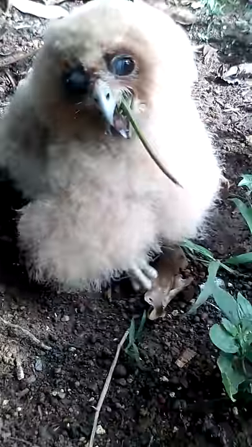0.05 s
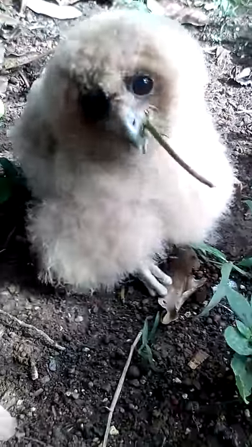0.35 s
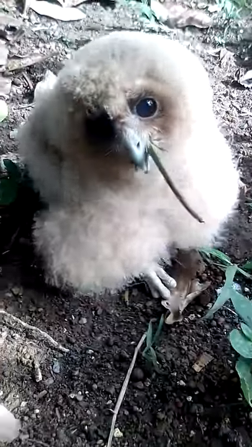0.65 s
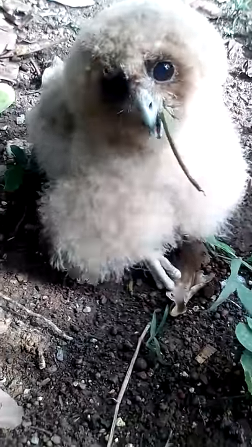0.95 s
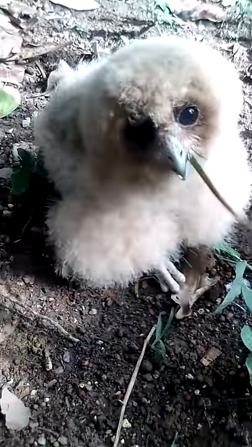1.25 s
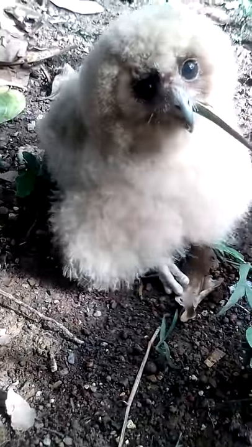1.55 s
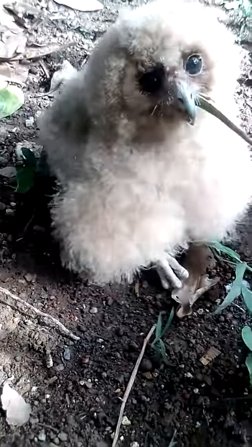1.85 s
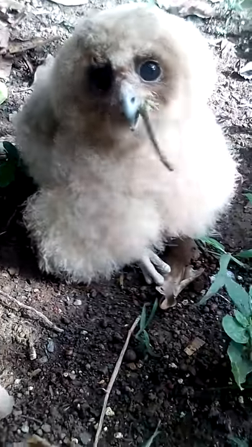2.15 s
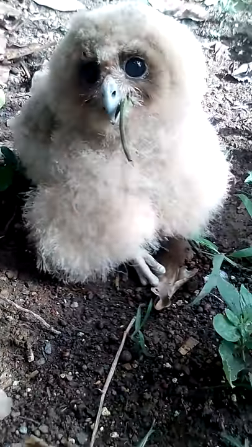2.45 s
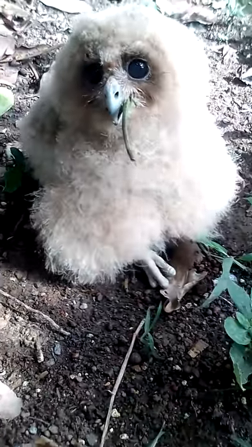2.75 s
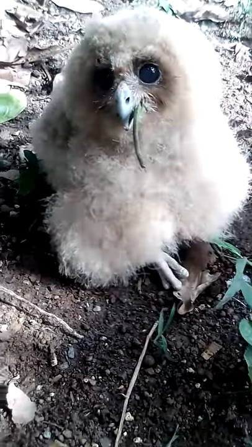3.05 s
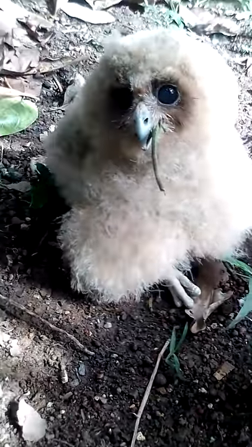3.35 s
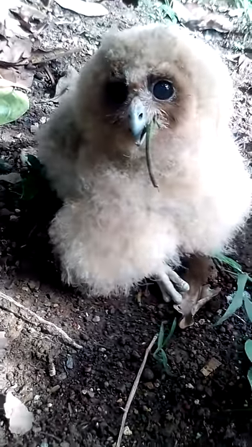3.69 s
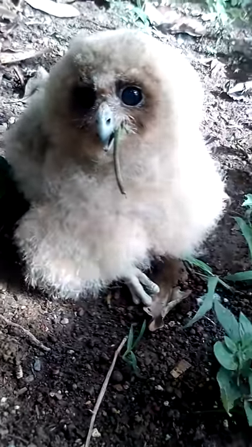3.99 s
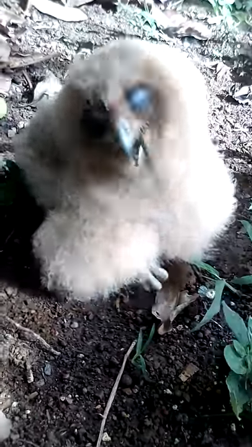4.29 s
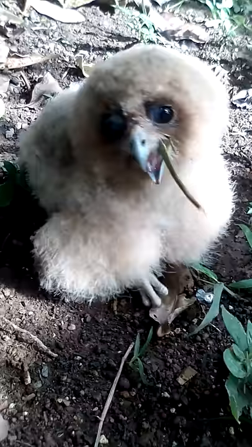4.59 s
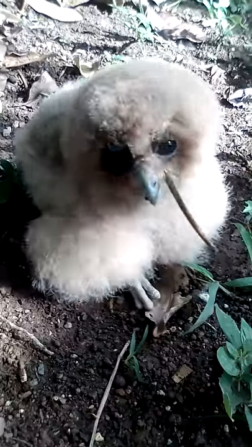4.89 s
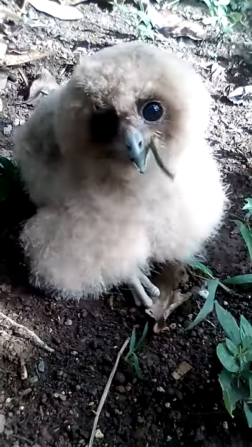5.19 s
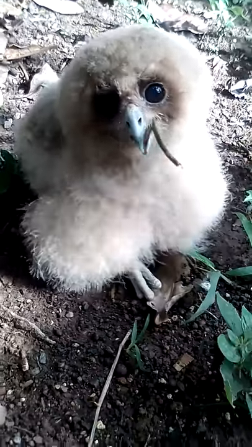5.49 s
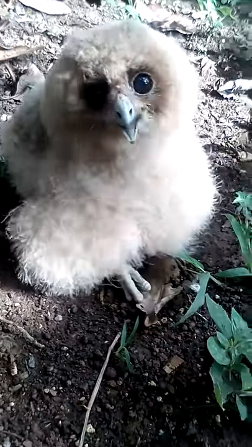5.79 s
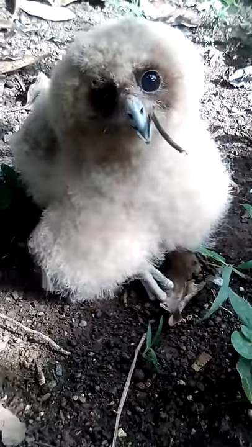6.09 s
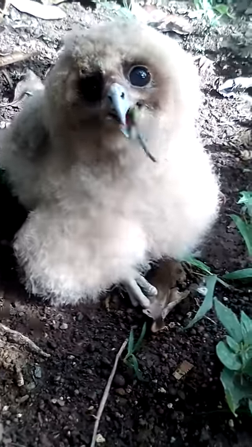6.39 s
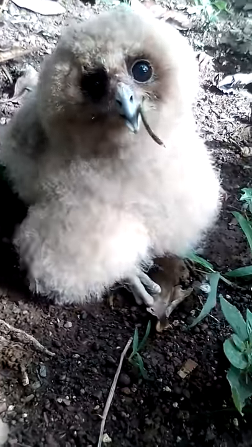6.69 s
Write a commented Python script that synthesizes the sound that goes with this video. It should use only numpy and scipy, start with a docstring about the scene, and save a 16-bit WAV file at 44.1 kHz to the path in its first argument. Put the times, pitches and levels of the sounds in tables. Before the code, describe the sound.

A small dog yaps and whines in a yard while a distant songbird trills, then an owl chick snaps its bill once.

```python
"""A yard: low outdoor murmur and a thin, steady high tone throughout. A small dog, out of sight, yaps
once, then whines, its wavering pitch breaking into a growl. From 1.2 s a songbird trills farther off,
while the dog yaps twice, whines again over a far motor and yaps three times. Muffled whimpers and a few
chirps follow. At 6.1 s an owl chick on the ground rustles and snaps its bill once, then scuffs softly."""
import sys
import numpy as np
from scipy import signal
from scipy.fft import rfft, irfft
from scipy.io import wavfile
from scipy.ndimage import uniform_filter1d, minimum_filter1d

SR = 44100
rng = np.random.default_rng(int(sys.argv[2]) if len(sys.argv) > 2 else 0)


def store_wav(level_fs):
    """Save 16-bit WAV to argv[1]."""
    pcm = np.round(np.clip(np.atleast_2d(level_fs), -1, 1) * 32767)
    wavfile.write(sys.argv[1], SR, pcm.T.astype(np.int16))


N = 297234
TIME = np.arange(N) / SR


def from_db(db):
    return 10 ** (np.asarray(db) / 20)


def unit_rms(x):
    return x / np.sqrt(np.mean(x ** 2) + 1e-20)


def ramp(x):
    return np.clip(x, 0, 1)


def peak(hz, centre_hz, half_width_hz):
    """Resonance curve, height 1."""
    return 1 / (1 + ((hz - centre_hz) / half_width_hz) ** 2)


def in_time(rows, t=TIME):
    """Table columns interpolated at t."""
    times, *columns = np.transpose(rows)
    return [np.interp(t, times, column) for column in columns]


def at_hz(points, hz, column=1):
    """Table column interpolated in log frequency."""
    points = np.array(points)
    return np.interp(np.log(hz + 1e-9), np.log(points[:, 0]), points[:, column])


def span(start_s, end_s):
    """Indices, times and a gate with 4 ms edges."""
    at = np.flatnonzero((TIME >= start_s) & (TIME <= end_s))
    t = TIME[at]
    return at, t, ramp(np.minimum(t - t[0], t[-1] - t) / .004)


def noise(spectrum, size):
    """Coloured noise, rolled off below the first point; rms 1."""
    hz = np.arange(size // 2 + 1) * SR / size
    low_cut = np.minimum(hz / spectrum[0][0], 1) ** 8
    white = rfft(rng.standard_normal(size))
    return unit_rms(irfft(white * low_cut * from_db(at_hz(spectrum, hz)), size))


def drift(rate_hz, size):
    """Low-passed random wander; rms 1."""
    hz = np.arange(size // 2 + 1) * SR / size
    white = rfft(rng.standard_normal(size))
    return unit_rms(irfft(white * (hz > 0) * peak(hz, 0, rate_hz), size))


def phase_of(hz):
    return 2 * np.pi * np.cumsum(hz) / SR


def glides(rows, jitter):
    """Short, swelling tones that slide in pitch."""
    out = np.zeros(N)
    for start_s, length_s, first_hz, last_hz, level_db in rows:
        at, t, _ = span(start_s, start_s + length_s)
        pitch_hz = np.interp(t, [start_s, start_s + length_s], [first_hz, last_hz])
        pitch_hz *= 1 + jitter * drift(340, len(t))
        out[at] += from_db(level_db) * np.hanning(len(t)) * np.sin(phase_of(pitch_hz))
    return out


# murmur spectrum: (frequency [Hz], density [dB])
MURMUR_SPECTRUM = [(20, -24), (45, -9.5), (85, 2.5), (160, 1), (350, -3.5), (620, -9.5), (790, -4.5),
                   (1150, -17), (1500, -11.5), (2000, -17), (2500, -16.5), (3300, -22.5), (6500, -24.5),
                   (9000, -31), (15500, -29.5)]
# rumble swing: (time [s], gain [dB])
RUMBLE_SWING = [(0, 9), (.7, -2), (1.5, 0.5), (3.6, -3.5), (4.5, 4.5), (6.1, -3), (6.74, 0.5)]


def murmur(level_db=-57.5, flutter_db=1.5, gust_db=1.5, rumble_hz=220):
    """Outdoor noise with an uneven low rumble."""
    air = from_db(level_db + flutter_db * drift(6.5, N)) * noise(MURMUR_SPECTRUM, N)
    rumble = signal.sosfiltfilt(signal.butter(2, rumble_hz, fs=SR, output="sos"), air)
    swing_db = in_time(RUMBLE_SWING)[0] + gust_db * drift(6, N)
    return air - rumble + rumble * from_db(swing_db)


def far_motor(hum_hz=74, idle_db=-76, full_db=-55.5, start_s=2.08, end_s=3, fade_s=.14):
    """A hum swells from idle and sinks back."""
    running = ramp(np.minimum(TIME - start_s, end_s - TIME) / fade_s)
    rms = from_db(idle_db + (full_db - idle_db) * running)
    return np.sqrt(2) * rms * np.sin(phase_of(hum_hz + 2 * drift(8, N)))


def high_tone(pitch_hz=12880, width_hz=35, level_db=-76):
    """A thin, steady tone with slight jitter."""
    return np.sqrt(2) * from_db(level_db) * np.sin(phase_of(pitch_hz + width_hz * drift(100, N)))


# yard reverberation: (frequency [Hz], t60 [s], gain [dB])
YARD_DECAY = [(301.8, 0.37, -34), (745, 0.4, -24.5), (1090, 0.74, -27), (1680, 0.61, -20),
              (3140, 0.53, -17.5), (6000, 0.17, -13.5), (12000, 0.37, -9.5)]


def yard_scatter(x, wet_db, build_s=.0053):
    """Diffuse scatter from walls and leaves, decaying band by band."""
    t, response = TIME[:SR], np.zeros(SR)
    edges_hz = np.geomspace(200, 15000, 14)
    for low_hz, high_hz in zip(edges_hz, edges_hz[1:]):
        hz = np.sqrt(low_hz * high_hz)
        decay = from_db(-60 * t / at_hz(YARD_DECAY, hz)) * (1 - np.exp(-t / build_s))
        bandpass = signal.butter(2, [low_hz, high_hz], "band", fs=SR, output="sos")
        band = signal.sosfilt(bandpass, rng.standard_normal(SR))
        response += band * decay / np.linalg.norm(decay) * from_db(at_hz(YARD_DECAY, hz, column=2))
    return from_db(wet_db) * signal.fftconvolve(x, response)[:N]


# early reflections: (delay [s], gain [dB])
REFLECTIONS = [(.0045, -20.5), (.0158, -11), (.034, -23.5)]


def echoes(x):
    """Single bounces off the ground and walls."""
    return sum(from_db(db) * np.interp(TIME - delay_s, TIME, x, left=0) for delay_s, db in REFLECTIONS)


# one trill note: (position [0-1], pitch [Hz], gain [dB])
TRILL_NOTE = [(0, 7820, -25.5), (.2, 7865, -13), (.5, 6610, -13), (.75, 6115, 1.5), (.83, 5900, -10),
              (.92, 5394, 13), (1, 5200, -20)]
# trill scattered by foliage: (frequency [Hz], density [dB])
FOLIAGE_SPECTRUM = [(5250, -6.5), (5700, 4.5), (6500, -2), (7600, -7), (8600, -24), (14000, -50.5)]
# single chirps: (start [s], length [s], first pitch [Hz], last pitch [Hz], level [dB])
BIRD_CHIRPS = [(5.652, 0.05, 6220, 6890, -64.5), (5.786, 0.038, 7080, 6340, -61.5),
               (5.82, 0.033, 6480, 6040, -63), (5.87, 0.06, 5880, 5660, -63.5)]


def songbird(start_s=1.16, end_s=4.9, note_s=.1185, jitter=.011, rise_db_per_s=16, fall_db_per_s=7):
    """Falling notes, blurred by foliage, swell, hold and fade; single chirps follow."""
    out = glides(BIRD_CHIRPS, jitter)
    at, t, gate = span(start_s, end_s)
    envelope_db = -49.5 - rise_db_per_s * np.maximum(2 - t, 0) - fall_db_per_s * np.maximum(t - 2.78, 0)
    pitch_hz, note_db = in_time(TRILL_NOTE, (t - start_s) / note_s % 1)
    pitch_hz *= 1 + jitter * drift(270, len(t))
    notes = from_db(note_db - 7) * np.sin(phase_of(pitch_hz))
    blur = from_db(-13) * noise(FOLIAGE_SPECTRUM, len(t))
    out[at] += gate * from_db(envelope_db) * (notes + blur)
    return out


def knock(start_s, level_db, hz, t60_s, rise_s=.00029):
    """One mode, struck once."""
    age_s = np.clip(TIME - start_s, 0, 5 * t60_s)
    envelope = from_db(level_db - 60 * age_s / t60_s) * (1 - np.exp(-age_s / rise_s))
    return envelope * np.sin(2 * np.pi * hz * age_s)


# contacts of one snap: (time [s], strength [dB])
BILL_CONTACTS = [(6.061, -34), (6.1063, -12)]
# bill and mouth modes: (frequency [Hz], gain [dB], t60 [s])
BILL_MODES = [(560, -23, 0.01), (1480, -13, 0.0024), (3370, -18, 0.0032), (6300, -11, 0.0021),
              (6800, -8.5, 0.0021), (9000, -29, 0.0017)]
# dry rustle: (frequency [Hz], density [dB])
RUSTLE_SPECTRUM = [(800, -3), (2000, -23), (4000, -20), (6400, -10.5), (8500, -21), (14000, -37)]
# soft bumps and scuffs: (time [s], level [dB], pitch [Hz], t60 [s])
SCUFFS = [(6.432, -41, 693, 0.015), (6.461, -45.5, 1010, 0.036), (6.51, -41, 197, 0.027),
          (6.537, -39, 185, 0.04), (6.579, -37, 207, 0.023)]


def owl_chick(bill_gain_db=11.5, rustle_s=(5.87, 6.13), rise_db_per_s=85.5):
    """A rustle grows, the bill claps shut, scuffs follow."""
    out = sum(knock(start_s, bill_gain_db + strength_db + mode_db, hz, t60_s)
              for start_s, strength_db in BILL_CONTACTS for hz, mode_db, t60_s in BILL_MODES)
    at, t, gate = span(*rustle_s)
    rustle_db = -54.5 - rise_db_per_s * (rustle_s[1] - t)
    out[at] += gate * from_db(rustle_db) * noise(RUSTLE_SPECTRUM, len(t))
    return out + sum(knock(*scuff) for scuff in SCUFFS)


# growls: (start [s], end [s], depth [0-1])
GROWL_SPANS = [(0.274, 0.399, 1), (.4, 0.503, 0.37), (0.499, .63, .62), (3.389, 3.64, 0.59),
               (5.03, 5.73, 0.41)]


def growling(t, pitch_hz, onset_s=.024, break_hz_per_s=26000):
    """How far the folds split into strong and weak beats, 0-1: in growls and on fast slides."""
    held = sum(depth * ramp(np.minimum(t - start_s, end_s - t) / onset_s + .5)
               for start_s, end_s, depth in GROWL_SPANS)
    return ramp(held + np.abs(np.gradient(pitch_hz, t)) / break_hz_per_s)


# throat resonances: (frequency [Hz], gain [dB])
THROAT_RESPONSE = [(340, -11), (400, 1), (440, 9), (480, 4), (570, 12.5), (640, 5), (700, -1), (780, -10.5),
                   (850, 4), (950, 1), (1150, -14)]
# nearly closed muzzle: (frequency [Hz], gain [dB])
MUZZLE_RESPONSE = [(1050, -4.5), (1350, 1.5), (1750, 3), (2050, 0), (2400, -6.5), (2750, -18.5),
                   (3100, -19), (3450, -25.5), (4050, -18.5), (4850, -39), (5750, -26.5), (8000, -40),
                   (9800, -37), (12000, -49.5)]
# high nasal edge: (frequency [Hz], gain [dB])
NOSE_RESPONSE = [(5400, -1), (5900, 4.5), (6400, -16), (7200, -34.5), (14000, -46)]


def whine(rows, muffle_hz=13000, jitter=.003, growl_jitter=.012, shimmer_db=1.33, easy_db=-44):
    """A clean nasal tone; growling darkens it and adds lines halfway between the harmonics."""
    at, t, gate = span(rows[0][0], rows[-1][0])
    size = len(t)
    pitch_hz, voice_db, overtone_db = in_time(rows, t)
    pitch_hz = uniform_filter1d(pitch_hz, size=700)
    growl = growling(t, pitch_hz)
    phase = phase_of(pitch_hz * (1 + (jitter + growl_jitter * growl) * drift(81, size)))
    orders = np.arange(2, 57)[:, None] / 2
    hz, harmonic, low = orders * pitch_hz, orders % 1 == 0, orders <= 2
    weights = np.where(harmonic, 1, growl * from_db(-2))

    ring_db = 22 * growl * peak(hz, 720, 55)   # growling narrows the throat
    throat = low * weights * from_db(at_hz(THROAT_RESPONSE, hz) + ring_db)
    throat *= from_db(voice_db) / np.linalg.norm(throat, axis=0)

    bright_db = .5 * (overtone_db - easy_db) * ramp(hz / 2000 - 1)   # harder is brighter
    nasal_db = 4.5 * peak(hz, 2050, 45)
    uneven_db = 4.34 * np.array([drift(9.7, size) for _ in orders])
    muzzle = ~low * weights * from_db(at_hz(MUZZLE_RESPONSE, hz) + bright_db + nasal_db + uneven_db)
    muzzle *= from_db(overtone_db) / np.linalg.norm(muzzle, axis=0)
    muzzle /= 1 + (hz * (1 + 3 * growl) / muffle_hz) ** 4

    nose_hz = NOSE_RESPONSE[0][0]
    nose_gain = from_db(overtone_db - 18 - .35 * np.maximum(442 - pitch_hz, 0))   # fades below 442 Hz
    nose_gain /= 1 + (nose_hz / muffle_hz) ** 4
    nose = harmonic * (hz > nose_hz) * nose_gain * from_db(at_hz(NOSE_RESPONSE, hz) - 6)

    lines = np.sin(orders * phase + rng.uniform(0, 2 * np.pi, orders.shape))
    voice = ((throat + muzzle + nose) * lines).sum(0)
    voice += throat[0] * from_db(-19) * growl * np.sin(phase / 2)   # octave below
    breath = from_db(overtone_db - 25) * (1 + np.cos(phase)) * noise(MUZZLE_RESPONSE, size)
    hiss = nose_gain * from_db(-5) * noise(NOSE_RESPONSE, size)
    return at, gate * from_db(shimmer_db * drift(28, size)) * (np.sqrt(2) * voice + breath + hiss)


def bark_gesture(age_s, length_s, groan_s, top_hz, leap_s=.015, swell_s=.037, release_s=.029):
    """A rising groan leaps to a pitch arch, swells and is cut off; overtones follow the gape."""
    top_share, gape_share, sag_hz, end_drop_hz = .54, .61, 354.6, 150
    share = age_s / length_s
    release = ramp(1 - (length_s - age_s) / release_s)
    groan_hz = 345.8 + 4000 * age_s
    arch_hz = top_hz - sag_hz * ((share - top_share) / (1 - top_share)) ** 2 - end_drop_hz * release ** 2
    pitch_hz = groan_hz + (arch_hz - groan_hz) * ramp((age_s - groan_s) / leap_s)
    envelope_db = -13.5 * (1 - ramp((age_s - groan_s) / swell_s)) - 22.5 * release
    ring_db = 5.5 * peak(pitch_hz, 735, 45)   # pitch crosses the first resonance
    opening_db = -34.5 * ramp(1 - share / gape_share) ** 2.71
    closing_db = -23.5 * ramp((share - gape_share) / (1 - gape_share)) ** 2
    return pitch_hz, envelope_db + ring_db, opening_db + closing_db


# open mouth: (frequency [Hz], gain [dB])
MOUTH_RESPONSE = [(1000, -16), (1250, -12), (1415, 2.5), (1600, -3.5), (1830, -3.5), (2350, -16.5),
                  (3100, -16), (3650, -25.5), (4100, -27), (4800, -44.5), (5500, -33), (7100, -36.5),
                  (10000, -49.5), (14000, -75)]


def bark(start_s, length_s, groan_s, top_hz, voice_db, overtone_db, treble_db,
         jitter=.015, shimmer_db=4.5, attack_s=.02, push_s=.067):
    """A hard-driven voice; at its height the cycles group in threes and torn air rasps."""
    at, t, gate = span(start_s, start_s + length_s)
    size, age_s = len(t), t - start_s
    pitch_hz, envelope_db, gape_db = bark_gesture(age_s, length_s, groan_s, top_hz)
    phase = phase_of(pitch_hz * (1 + jitter * drift(150, size)))
    chaos = from_db(.37 * (gape_db - gape_db.max()))
    thirds = np.arange(2, 54)[:, None]
    orders, harmonic = thirds / 3, thirds % 3 == 0
    wander_rad = np.where(harmonic, .3, 1.2) * np.array([drift(41, size) for _ in orders])
    lines = np.sin(orders * phase + wander_rad + rng.uniform(0, 2 * np.pi, orders.shape))
    lines *= from_db(shimmer_db * np.array([drift(50, size) for _ in orders]))

    def through(response, split, rasp, shift=1, bright_db=0):
        """Lines and torn air in one part of the tract; rms 1."""
        hz = orders * pitch_hz / shift
        gains = from_db(at_hz(response, hz) + bright_db * ramp(hz / 2000 - 1))
        gains *= ramp(hz / response[0][0]) ** 4 * np.where(harmonic, 1, split * chaos)
        voiced = (gains * lines).sum(0) / np.sqrt((gains ** 2).sum(0) / 2)
        sound = voiced + rasp * chaos * noise(response, size)
        return sound / np.sqrt(uniform_filter1d(sound ** 2, size=500) + 1e-9)

    # first resonance: (frequency [Hz], gain [dB])
    formant = [(380, -21), (540, -19.5), (720, 2.5), (880, -3.5), (1020, -12.5), (1250, -27), (2200, -74)]
    jaw_shift = np.interp(t, [t[-1] - .04, t[-1]], [1, .82])   # the shutting jaw lowers it
    push_db = 10 * ramp(age_s / groan_s) * ramp(1 - age_s / push_s)   # the first push is brightest
    throat = through(formant, split=.29, rasp=.038, shift=jaw_shift)
    mouth = through(MOUTH_RESPONSE, split=1, rasp=.33, bright_db=treble_db + push_db)
    voice = from_db(voice_db + envelope_db) * throat + from_db(overtone_db + gape_db) * mouth
    bass_cut = signal.butter(6, 375, "high", fs=SR, output="sos")   # the bark carries no bass below 375 Hz
    return at, signal.sosfilt(bass_cut, gate * ramp(age_s / attack_s) * voice)


# voice cracks: (start [s], length [s], first pitch [Hz], last pitch [Hz], level [dB])
YELPS = [(1.358, 0.033, 796, 686, -27), (3.086, 0.023, 774, 725, -26.5)]
# one curve per whimper: (time [s], pitch [Hz], low voice [dB], overtones [dB])
WHIMPER_CURVES = [
    [(5.05, 493, -71, -51), (5.085, 561, -43, -42.5), (5.135, 560, -51.5, -46.5), (5.165, 560, -70, -73)],
    [(5.29, 471, -62.5, -48), (5.33, 458, -45, -48), (5.37, 557, -51.5, -41), (5.46, 439, -47.5, -55),
     (5.575, 538, -50, -55), (5.65, 495, -44.5, -57), (5.71, 453, -61, -74)],
]
# one curve per whine: (time [s], pitch [Hz], low voice [dB], overtones [dB])
WHINE_CURVES = [
    [(0.29, 390.1, -47, -59), (0.308, 398, -51, -55), (0.35, 488.4, -32, -48), (0.376, 454, -39.5, -47),
     (0.412, 394.5, -47, -50), (0.49, 413.4, -46, -45.5), (0.518, 445.2, -40.5, -53.5),
     (0.562, 475.4, -39, -47.5), (0.608, 556, -26.5, -39.5), (0.626, 593, -25, -44),
     (0.648, 401.4, -38.5, -42), (0.718, 376.3, -50.5, -44), (0.79, 386.5, -47, -47.5),
     (0.908, 441, -32.5, -45.5), (0.954, 414.7, -35.5, -42), (1.058, 401.2, -42.5, -44),
     (1.266, 434, -31, -45), (1.346, 416.7, -32, -40), (1.374, 374.5, -47, -43), (1.4, 366.9, -69, -63)],
    [(2.36, 346.5, -37, -58), (2.38, 357, -44, -45), (2.428, 518, -26, -36), (2.492, 356, -43, -43),
     (2.568, 371.3, -47.5, -48), (2.63, 450, -34, -44), (2.736, 387.4, -40.5, -44.5),
     (2.842, 469.8, -34.5, -45.5), (2.944, 407.7, -35.5, -45.5), (3.01, 418.7, -32, -44.5),
     (3.056, 542, -35.5, -37.5), (3.086, 489.4, -35, -40.5), (3.098, 424.8, -32, -40),
     (3.202, 405.7, -33.5, -37.5), (3.236, 561, -28, -37), (3.264, 633, -22.5, -35), (3.326, 557, -17, -42),
     (3.394, 384.7, -40.5, -40), (3.568, 356.2, -32, -41), (3.61, 329.3, -44.5, -56.5)],
]
# yaps: (start [s], length [s], groan [s], top pitch [Hz], low voice [dB], overtones [dB], treble [dB])
YAPS = [(-.125, 0.18, .025, 786.3, -14, -17, 3), (1.596, .178, .014, 875, -15.5, -16, -1.5),
        (1.973, 0.19, .022, 848, -15.5, -16, -2), (3.81, 0.19, 0.029, 886, -15.5, -16.5, 0.5),
        (4.204, .19, 0.036, 849, -14, -16.5, -1.5), (4.627, 0.19, 0.038, 847, -16.5, -18, -4)]


def dog():
    """Yelps, barks, whimpers and whines from one throat."""
    out = glides(YELPS, jitter=.0097)
    barks = [bark(*row) for row in YAPS]
    whimpers = [whine(rows, muffle_hz=3250) for rows in WHIMPER_CURVES]
    whines = [whine(rows) for rows in WHINE_CURVES]
    for at, sound in barks + whimpers + whines:
        out[at] += sound
    return out


def scene():
    """Three animals, their reflections and the background; mono."""
    voice, bird, chick = dog(), songbird(), owl_chick()
    scatter = yard_scatter(voice, wet_db=5.5) + yard_scatter(bird, wet_db=11.5)
    scatter += yard_scatter(chick, wet_db=-26.5)
    far_walls = yard_scatter(yard_scatter(voice, wet_db=2), wet_db=-1, build_s=.06)
    background = murmur() + far_motor() + high_tone()
    return (background + far_walls + scatter + echoes(voice) + bird + chick + voice)[None]


def record(dry, ceiling=.84, cutoff_hz=15830):
    """Fast peak limiter, then a steep low-pass."""
    allowed = ceiling / np.maximum(np.abs(dry), ceiling)
    gain = uniform_filter1d(minimum_filter1d(allowed, size=400), size=400)
    return signal.sosfilt(signal.ellip(10, .1, 80, cutoff_hz, fs=SR, output="sos"), dry * gain)


dry = scene()
out = record(dry)
store_wav(out)
```